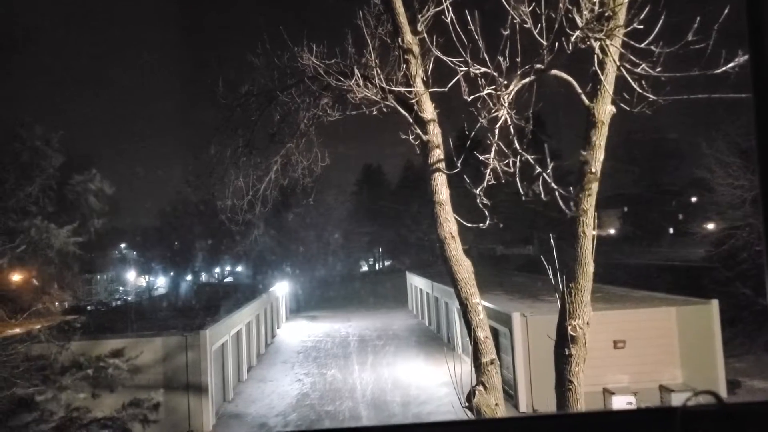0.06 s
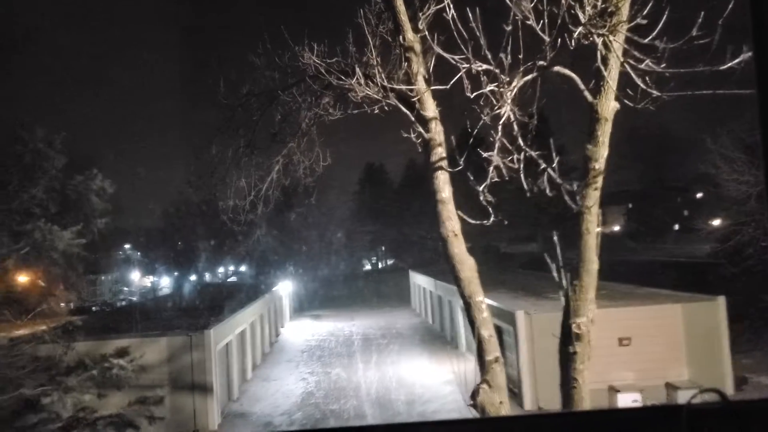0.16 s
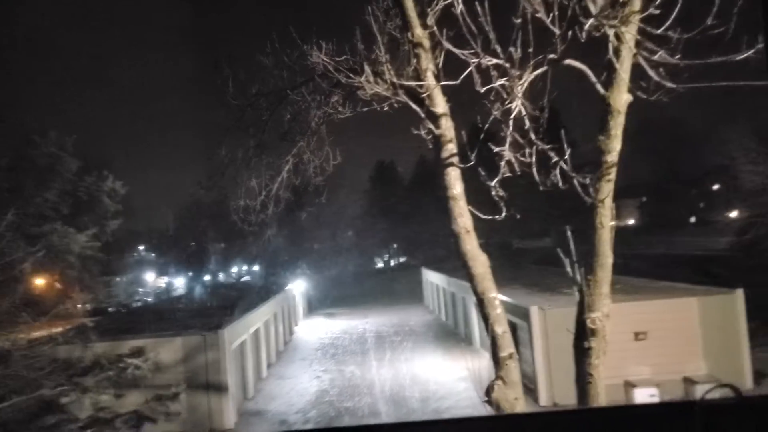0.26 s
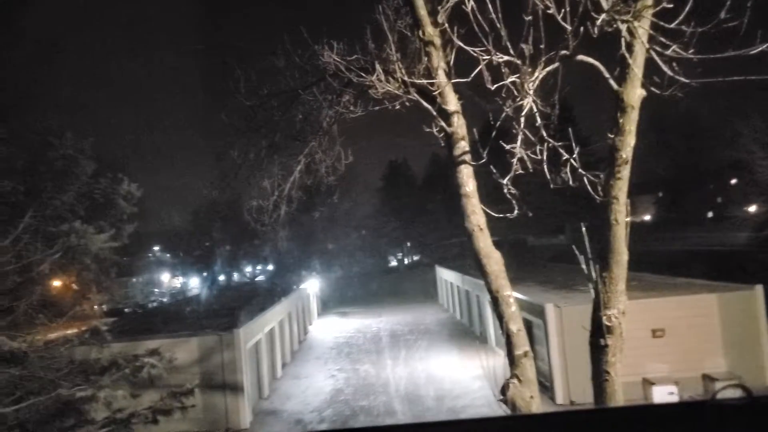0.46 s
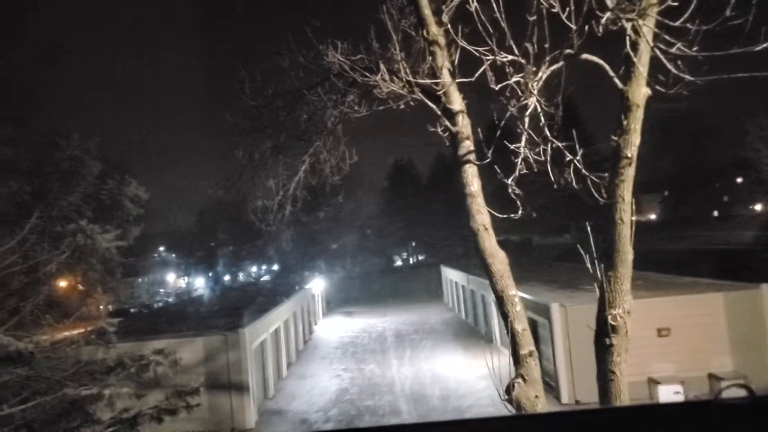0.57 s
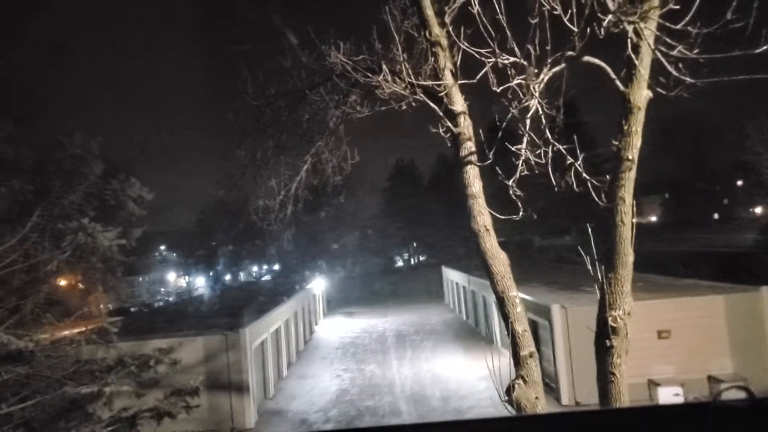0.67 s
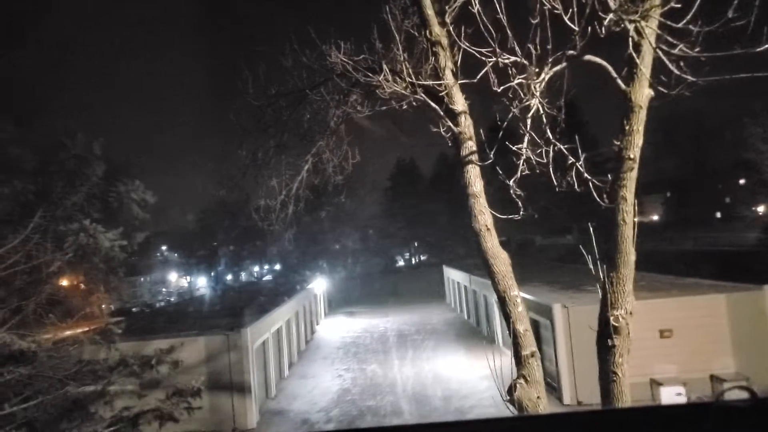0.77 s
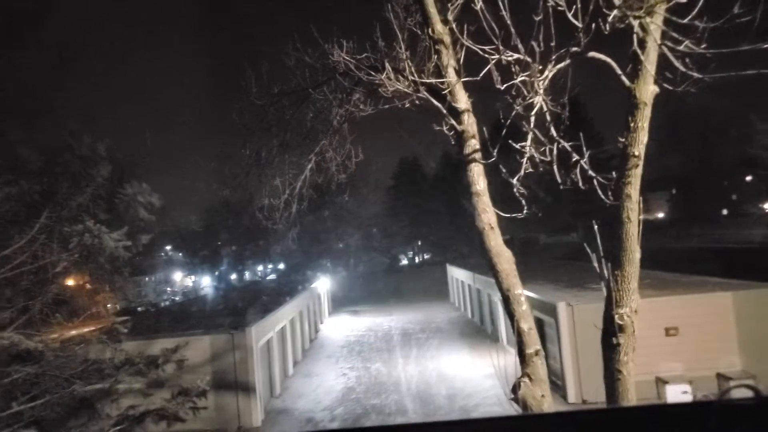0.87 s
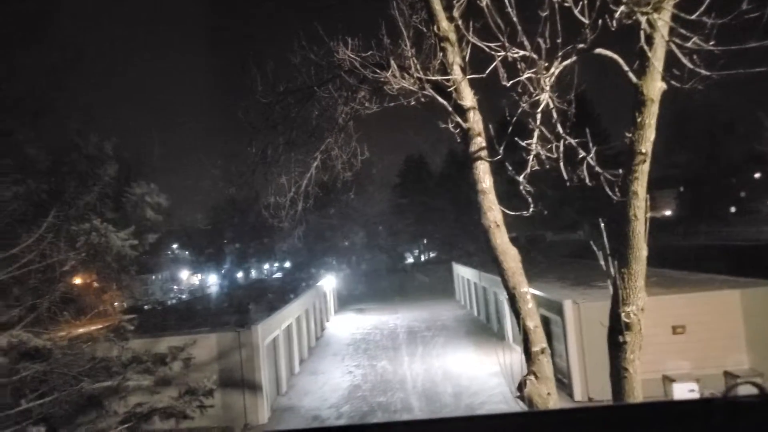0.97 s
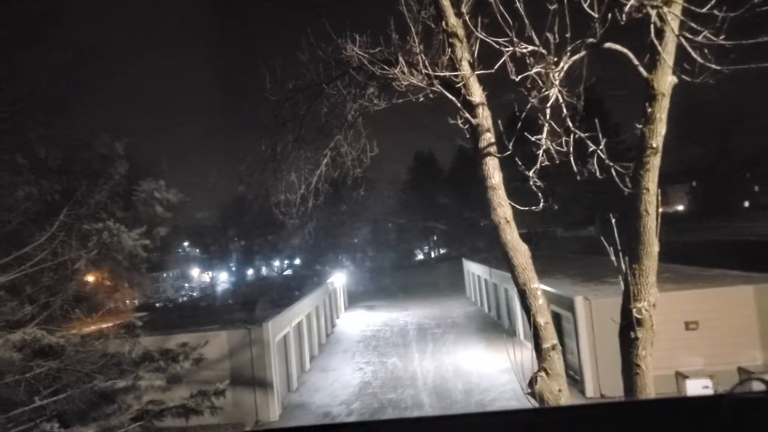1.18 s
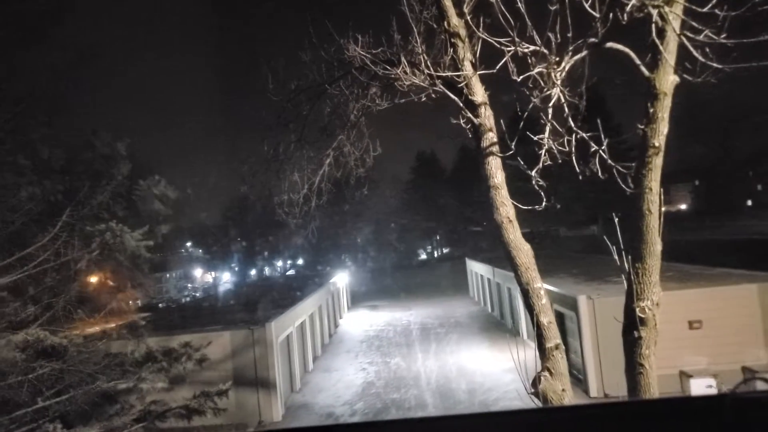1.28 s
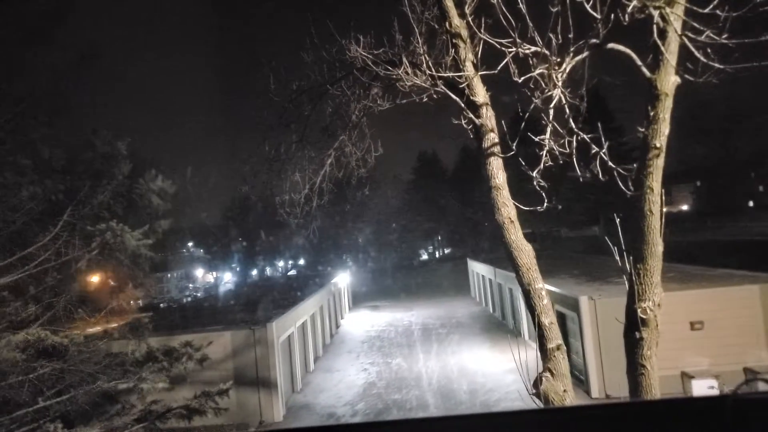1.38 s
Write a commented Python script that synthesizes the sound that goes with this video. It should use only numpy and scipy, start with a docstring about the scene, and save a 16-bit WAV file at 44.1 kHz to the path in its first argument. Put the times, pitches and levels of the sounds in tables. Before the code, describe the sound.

Two short gusts of wind rumble and thump on the microphone outdoors, the second weaker.

```python
"""Night gusts on a phone microphone

Outdoors at night, two gusts hit a phone's right microphone port; the left port lies in the lee.
Right on the microphone, large eddies rumble, small ones tear and hiss, and a few thump the diaphragm.
Farther off, wind rushes in bare trees and howls faintly, over a distant hum and the microphones' hiss."""
import sys
import numpy as np
from scipy import signal
from scipy.fft import rfft, irfft
from scipy.io import wavfile
from scipy.ndimage import uniform_filter1d

SR = 44100
rng = np.random.default_rng(int(sys.argv[2]) if len(sys.argv) > 2 else 0)


def inscribe(sig):
    """Save sig as 16-bit PCM at rate SR to the path in sys.argv[1].

    A 1-D sig is mono; a 2-D sig holds one channel per row.
    Samples are clipped to [-1, 1] before scaling.
    """
    pcm = np.round(np.clip(np.atleast_2d(sig).T, -1, 1) * 32767)
    wavfile.write(sys.argv[1], SR, pcm.astype(np.int16))


N = 63945
T = np.arange(N) / SR

# spectrum of the large eddies at either port: frequency_hz, relative_db
RUMBLE_SPECTRUM = [(20, -39), (30, -16), (42, -1), (60, -2.5), (90, 2.5), (140, -5.5), (240, -8.5),
                   (400, -16.5), (700, -26), (1400, -39), (3000, -89)]
RUMBLE_COLUMN, HISS_COLUMN, FINE_COLUMN = 1, 2, 3  # layers of the gust tables
FINE_HZ = 3700  # the finest eddies lie above this


def gust_gain(column):
    """Gain of one layer as two gusts reach the phone, each with a sharp attack and a short release."""
    # wind strength in each gust: time_s, rumble_db, hiss_db, fine_eddy_gain_db
    first_gust = [(.229, -28.5, -31.5, -2), (.24, -28, -40, 10), (.274, -37, -38, 7), (.297, -24, -30.5, 7),
                  (.315, -27, -36.5, 8.5), (.358, -31, -44, 9.5), (.385, -32.5, -42.5, 7),
                  (.436, -24, -38, 5.5), (.458, -22, -38.5, 2.5), (.483, -23, -34.5, 0),
                  (.503, -26.5, -41, 7), (.525, -37.5, -48.5, 6), (.555, -39, -46, -3),
                  (.578, -29.5, -46, 3), (.6, -35.5, -50.5, 3), (.628, -54.5, -64.5, 1),
                  (.66, -60.5, -74, -5)]
    second_gust = [(0.799, -46.5, -95, -4), (0.821, -42, -67, -2), (0.833, -37.5, -58.5, -3),
                   (0.869, -36.5, -47.5, -6), (.892, -35.5, -49, 1), (.93, -41, -48.5, -1),
                   (.965, -35.5, -46, 1), (.988, -35, -42, 3), (1.015, -35, -49.5, 6.5),
                   (1.042, -34.5, -48.5, 4.5), (1.078, -43.5, -46, 0), (1.109, -48, -53.5, 5),
                   (1.155, -52.5, -59.5, 0), (1.2, -50, -56.5, -5), (1.24, -61, -54.5, -3),
                   (1.291, -49.5, -59, -11), (1.34, -58, -80, -9)]
    attack_s, release_s = 0.0011, 0.03
    gain = 0
    for gust in (np.array(first_gust), np.array(second_gust)):
        times = gust[:, 0]
        edges = np.exp(np.minimum(T - times[0], 0) / attack_s - np.maximum(T - times[-1], 0) / release_s)
        gain = gain + edges * undb(np.interp(T, times, gust[:, column]))
    return gain


def turbulence():
    """On the windward port, large eddies rumble; small ones hiss in spurts and make its cavity fizz."""
    # spectra of the small eddies and of the cavity's resonance: frequency_hz, relative_db
    hiss_spectrum = [(120, -2), (300, 2), (550, 3.5), (1000, -1), (2000, -6.5), (3400, -13), (4500, -21),
                     (6000, -33), (8000, -49.5), (11000, -48)]
    cavity_spectrum = [(6000, -58), (8000, -28.5), (10000, -9.5), (11500, -1.5), (12700, 0.5),
                       (14000, -5.5), (15500, -16)]
    rough_hz, rumble_rough_db, hiss_rough_db = 263, 3.5, 1
    flutter_db = 1  # the hiss swells with each swing of the large eddies
    fizz_db, full_hiss_db, fizz_growth = -59.5, -40.5, 0.99  # growth in dB per dB of hiss
    large_eddies = steady(noise(RUMBLE_SPECTRUM))
    rumble = large_eddies * gust_gain(RUMBLE_COLUMN) * undb(rumble_rough_db * waver(rough_hz))
    strength = gust_gain(HISS_COLUMN)
    small_eddies = noise(hiss_spectrum)
    coarse = signal.sosfiltfilt(signal.butter(3, FINE_HZ, fs=SR, output="sos"), small_eddies)
    fine = (small_eddies - coarse) * gust_gain(FINE_COLUMN)
    hiss = (coarse + fine) * strength
    fizz = noise(cavity_spectrum) * undb(fizz_db) * (strength / undb(full_hiss_db)) ** fizz_growth
    spurts = steady(undb(hiss_rough_db * waver(rough_hz) + flutter_db * large_eddies))
    return rumble + (hiss + fizz) * spurts


def thumps():
    """Each eddy is a short drop in pressure; the port swings back after it and the duct rings briefly."""
    # single eddies arriving at the port: peak_s, pressure_db, half_length_ms
    eddies = [(.2305, -15, 0.38), (0.2328, -14.5, 0.52), (.238, -9.5, 4.6), (.2892, -13.5, 0.062),
              (0.2954, -12, .08), (.298, -14.5, 0.052), (.301, -11, 0.031), (0.3019, -13, 0.38),
              (0.3247, -20.5, 0.16), (.413, -21.5, 0.4), (0.4447, -10.5, 0.26), (.4545, -13, 1.1),
              (0.466, -9, 1.8), (.482, -8, 1.26), (.571, -21, 2), (.586, -23.5, 1.9), (.830, -29, 0.64),
              (0.864, -23.5, 0.98), (.888, -28.5, .22), (.989, -21.5, 1.3), (.996, -29, 0.13),
              (1.037, -22.5, 1.5)]
    port_hz, port_q = 79.3, 1.27  # bass roll-off of the port
    duct_hz, duct_q = 3530, 0.82  # treble roll-off of the duct behind it
    pulses = sum(undb(db) / (1 + ((T - peak_s) * 1e3 / ms) ** 2) ** 1.5 for peak_s, db, ms in eddies)
    suction = -crackle() - pulses
    port_w, duct_w = 2 * np.pi * port_hz, 2 * np.pi * duct_hz
    port = signal.bilinear([1, 0, 0], [1, port_w / port_q, port_w ** 2], SR)
    duct = signal.bilinear([duct_w ** 2], [1, duct_w / duct_q, duct_w ** 2], SR)
    swung = signal.lfilter(*port, suction)
    rung = signal.lfilter(*duct, swung)
    return signal.sosfilt(signal.butter(2, FINE_HZ, fs=SR, output="sos"), rung)


def crackle():
    """Small eddies tick against the port at random, harder as the gust hisses louder."""
    ticks_per_s, over_hiss_db, spread_db, corner_hz = 170, 7, 1.5, 650
    hits = rng.random(N) < ticks_per_s / SR
    ticks = hits * undb(over_hiss_db + spread_db * rng.standard_normal(N)) * gust_gain(HISS_COLUMN)
    return signal.lfilter([1], [1, -np.exp(-2 * np.pi * corner_hz / SR)], ticks)


def breeze(level_db):
    """Lighter wind buffets the phone and rushes in the bare trees behind it."""
    # spectrum of the breeze: frequency_hz, relative_db
    spectrum = [(20, -24), (40, -12), (60, 0.5), (90, -2), (140, -12), (260, -14), (400, -27), (700, -25.5),
                (1050, -25), (1500, -37.5), (2500, -49.5), (5000, -51), (7000, -64)]
    # its rise and fall: time_s, gain_db
    swells = [(0, -7), (.13, -20.5), (.185, -1), (.4, 2.5), (.54, 4), (.7, -6), (.8, -3.5), (.88, 0),
              (1.05, 2), (1.2, -2), (1.45, -3.5)]
    swell_db = np.interp(T, *np.array(swells).T)
    return steady(noise(spectrum), window_samples=2000) * undb(level_db + swell_db)


def howl():
    """Wind in branches and railings sounds narrow, unsteady tones that swell and creep up in pitch."""
    # resonances: start_s, peak_s, pitch_hz, width_hz, level_db
    resonances = [(.25, 1.15, 507.3, 30.5, -64.5), (.9, 1.36, 607, 28, -68.5)]
    fade_s, rise_per_s = 0.35, 0.084
    tones = 0
    for start_s, peak_s, pitch_hz, width_hz, level_db in resonances:
        phase = 2 * np.pi * np.cumsum(pitch_hz * (1 + rise_per_s * (T - peak_s))) / SR
        tone = unit(waver(width_hz / 2) * np.cos(phase) + waver(width_hz / 2) * np.sin(phase))
        swell = np.interp(T, [start_s, peak_s, peak_s + fade_s], [0, 1, 0])
        tones = tones + tone * undb(level_db) * swell
    return tones


def night_hum(level_db):
    """The steady, low hum of the night, far from the microphones."""
    # spectrum of the hum: frequency_hz, relative_db
    spectrum = [(20, -10.5), (60, 4), (130, -4), (250, -7), (450, -22.5), (700, -31.5), (980, -13),
                (1250, -32.5), (2000, -42), (4000, -61)]
    return noise(spectrum) * undb(level_db)


def microphone_hiss(level_db):
    """One microphone's own faint hiss."""
    # its noise floor: frequency_hz, relative_db
    spectrum = [(1000, 5), (2500, 1), (4700, 0.5), (6000, -9), (7500, -16), (10000, -7), (12500, 1.5),
                (15500, -0.5)]
    return noise(spectrum) * undb(level_db)


def undb(db):
    """Decibels to gain."""
    return 10 ** (np.asarray(db) / 20)


def unit(x):
    """Scale to rms 1."""
    return x / np.std(x)


def shaped(gain):
    """Noise of rms 1 with the given gain over frequency."""
    hz = np.arange(N // 2 + 1) * SR / N + 1
    return unit(irfft(rfft(rng.standard_normal(N)) * gain(hz), N))


def noise(points):
    """Noise of rms 1 with a spectrum of (Hz, dB) points."""
    hz, db = np.array(points).T
    return shaped(lambda f: undb(np.interp(np.log(f), np.log(hz), db)))


def waver(hz):
    """Random wavering up to about the given rate, spread 1."""
    return shaped(lambda f: np.exp(-(f / hz) ** 2))


def steady(x, window_samples=900):
    """Hold a noise at steady strength, so that the wind alone sets its swells."""
    power = uniform_filter1d(x ** 2, window_samples)
    return x / np.sqrt(uniform_filter1d(power, window_samples))


def scene():
    """The gusts strike the right port and barely reach the left; both hear the night around them."""
    lee_db = -54
    windward = turbulence() + thumps()
    left = breeze(level_db=-53.5) + howl() + night_hum(level_db=-57.5) + microphone_hiss(level_db=-78)
    right = breeze(level_db=-54) + howl() + night_hum(level_db=-56) + microphone_hiss(level_db=-79.5)
    lee_rumble = noise(RUMBLE_SPECTRUM) * gust_gain(RUMBLE_COLUMN) * undb(lee_db)
    return np.array([left + lee_rumble, right + windward])


def record(dry):
    """The phone cuts the deepest bass and the top of the treble."""
    low_cut_hz, high_cut_hz = 34.3, 15650
    low_cut = signal.butter(4, low_cut_hz, "high", fs=SR, output="sos")
    high_cut = signal.ellip(10, 0.2, 80, high_cut_hz, fs=SR, output="sos")
    return signal.sosfilt(high_cut, signal.sosfilt(low_cut, dry))


dry = scene()
out = record(dry)
inscribe(out)
```